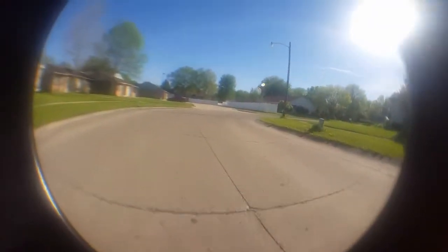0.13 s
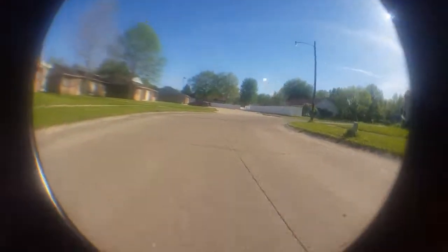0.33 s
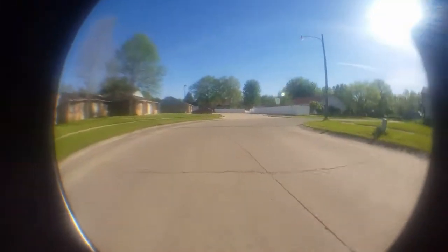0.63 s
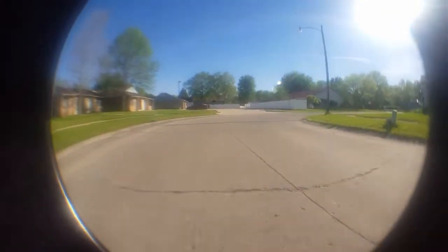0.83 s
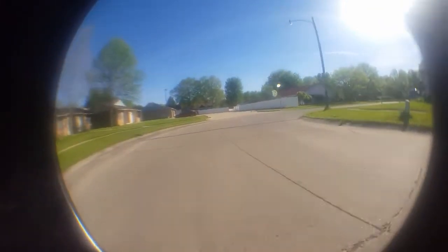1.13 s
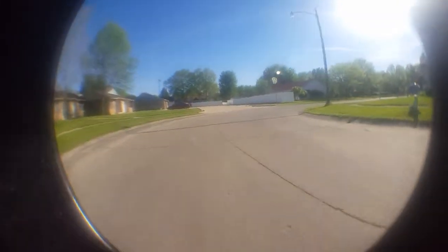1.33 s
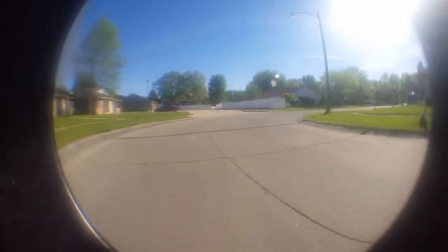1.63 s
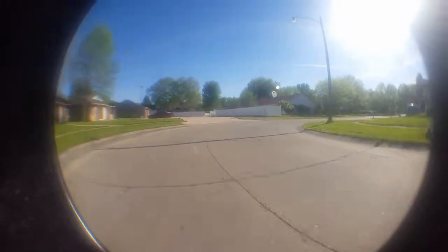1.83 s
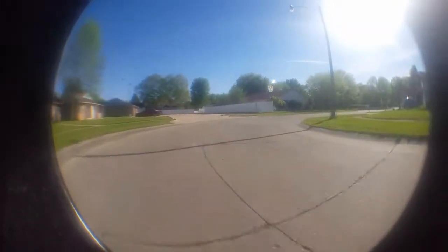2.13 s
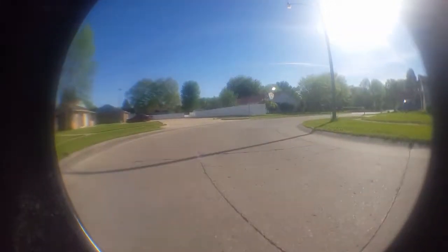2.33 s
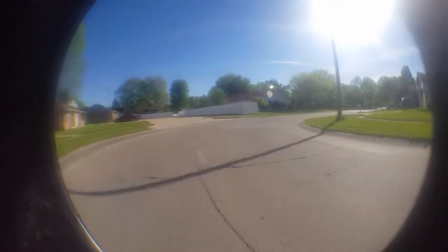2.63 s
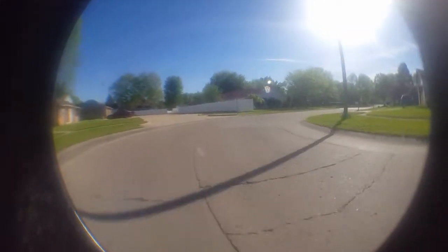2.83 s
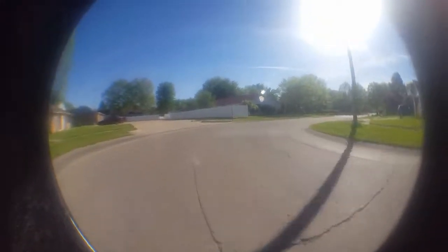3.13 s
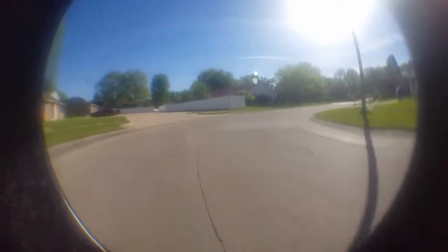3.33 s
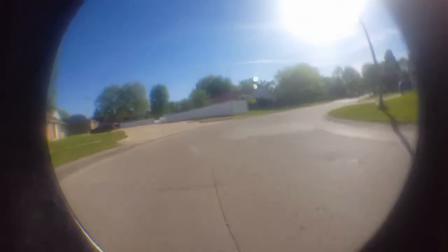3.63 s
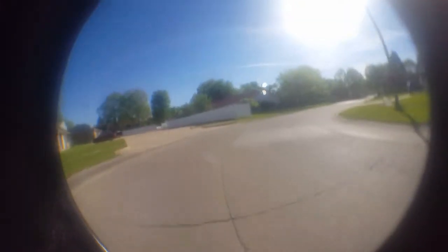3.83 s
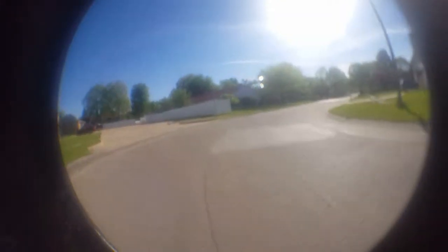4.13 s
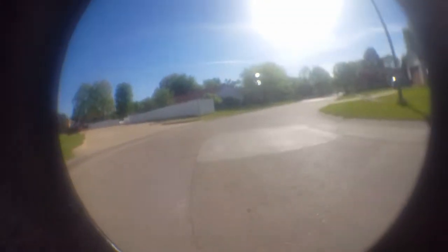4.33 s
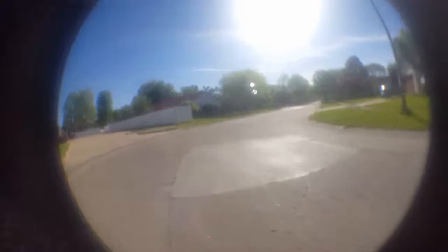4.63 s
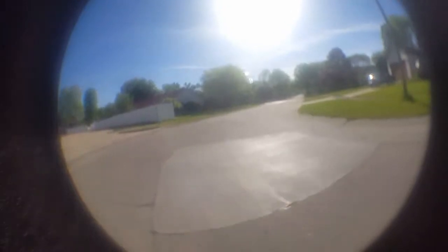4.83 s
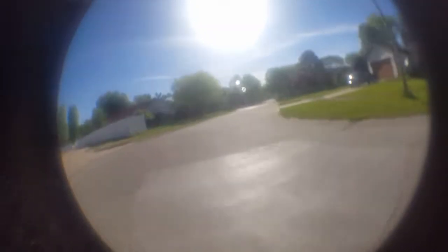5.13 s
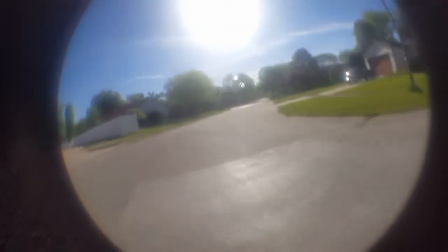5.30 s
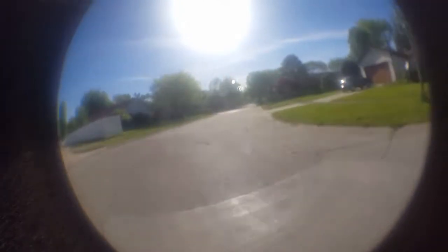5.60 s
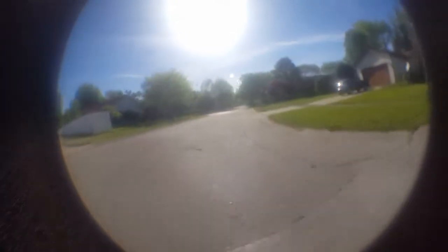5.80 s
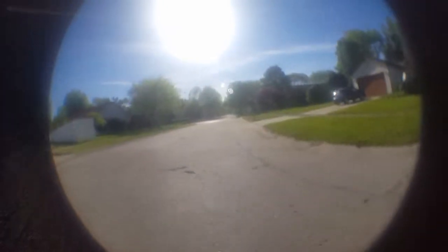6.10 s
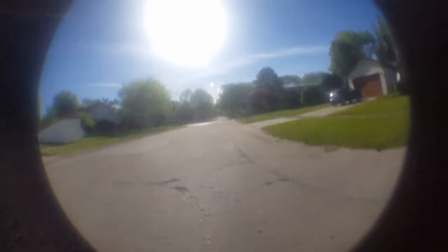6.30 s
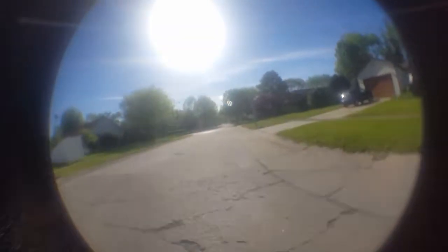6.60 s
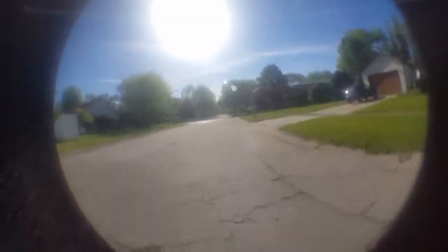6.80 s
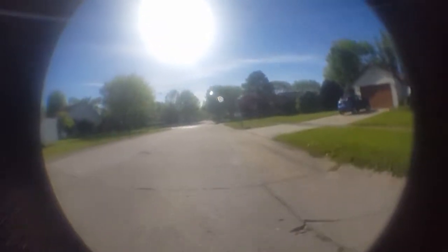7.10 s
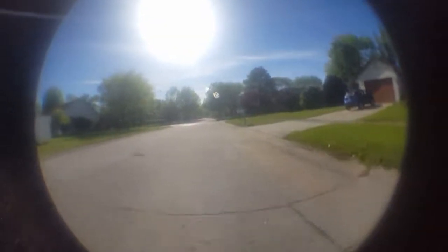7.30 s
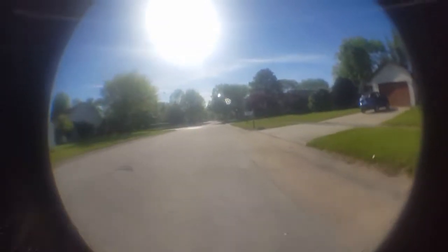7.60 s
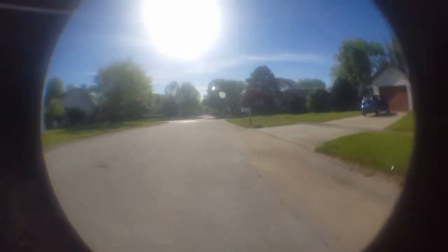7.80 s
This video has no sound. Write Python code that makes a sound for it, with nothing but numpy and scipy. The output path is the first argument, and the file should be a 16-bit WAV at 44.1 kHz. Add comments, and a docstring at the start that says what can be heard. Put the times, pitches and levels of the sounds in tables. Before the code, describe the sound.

Skateboard wheels rumble and hiss along a concrete street, knocking over cracks and crunching grit as gusts hit the microphone.

```python
"""A skateboard rolls along a concrete street, heard from a small camera carried on the ride.
From the start, the rough road shakes the wooden deck and rattles the trucks (the metal axle mounts),
the wheels hiss, the bearings sizzle and the headwind buffets both microphones. Soon the wheels crush
small stones and knock over cracks, the hardest with a clack. After about four seconds the wind eases,
after six a metallic hum comes up, and just before the end gusts return and the loudest clack lands."""
import sys
import numpy as np
from scipy import signal
from scipy.fft import rfft, irfft
from scipy.io import wavfile
from scipy.ndimage import uniform_filter1d, map_coordinates

SR = 44100
rng = np.random.default_rng(int(sys.argv[2]) if len(sys.argv) > 2 else 0)


def dump(signal):
    """Clip the signal to [-1, 1] and save it as 16-bit WAV at the path in sys.argv[1]."""
    limited = np.clip(np.atleast_2d(signal).T, -1, 1)
    pcm = np.round(limited * 32767).astype(np.int16)
    wavfile.write(sys.argv[1], SR, pcm)


N = 350595

# The road under the wheels. Each row: time in seconds, deck shake in dB,
# deck bending compared with the shake in dB, truck rattle in dB, wheel hiss in dB.
ROAD = [(0.0, -8.5, -1, -30, -31.5), (0.15, -22, -8, -40.5, -42.5), (0.45, -21, 1, -38.5, -40.5),
        (0.57, -19.5, 3, -42, -40), (0.75, -20, -1, -42.5, -41.5), (1.0, -18, 0, -39.5, -38.5),
        (1.45, -22.5, 0.5, -40, -38.5), (1.9, -20, -1.5, -41.5, -39), (2.2, -20.5, 4, -43, -37.5),
        (2.45, -16, -3, -39.5, -38.5), (2.8, -22, 0.5, -43, -38.5), (2.97, -25, 4.5, -48, -39),
        (3.3, -21, 1.5, -41.5, -40), (3.8, -17.5, -4.5, -41, -39), (4.2, -20.5, 0, -49.5, -41),
        (4.6, -20, 2.5, -44, -42), (4.72, -19.5, -0.5, -40, -42), (4.93, -15, -6, -36, -38.5),
        (4.99, -20, -2, -41, -44), (5.1, -15.5, 0, -39, -35), (5.24, -20, 3.5, -38, -39.5),
        (5.31, -17, -4, -30, -39), (5.38, -15.5, 1, -40, -42), (5.44, -16.5, -3, -35.5, -42),
        (5.55, -22.5, 0.5, -48.5, -42.5), (5.95, -21, 2, -45.5, -41.5), (6.15, -19.5, 4.5, -44, -41.5),
        (6.55, -18.5, 1.5, -39, -40.5), (6.75, -16.5, 2.5, -45, -40), (6.95, -16.5, 5, -40.5, -39),
        (7.1, -16, 0.5, -42.5, -40.5), (7.2, -20.5, 9, -45, -40), (7.3, -21.5, 3.5, -45, -42),
        (7.42, -13, 3.5, -38.5, -35), (7.72, -18, 6, -50, -38.5), (7.82, -20, 1.5, -50, -46),
        (7.95, -19, 5, -43, -45)]


def undb(db):
    return 10 ** (np.asarray(db) / 20)


def unit(x):
    return x / np.sqrt(np.mean(x ** 2))


def curves(table):
    """Join a table's rows with straight lines: one curve for each column after the time."""
    times, *columns = np.transpose(table)
    return [np.interp(np.arange(N) / SR, times, column) for column in columns]


def response(points, share=1):
    """A filter's answer to one click, built from (Hz, dB) points; share scales the dB."""
    hz, db = np.transpose(points)
    log_hz = np.log(np.maximum(np.arange(2049) * SR / 4096, 1))
    cepstrum = irfft(np.interp(log_hz, np.log(hz), share * db) * np.log(10) / 20)
    cepstrum[1:2048] *= 2  # folded so that nothing sounds before the click
    cepstrum[2049:] = 0
    return irfft(np.exp(rfft(cepstrum)))


def colour(x, impulse):
    return signal.fftconvolve(x, impulse)[:N]


def ring(x, hz, width):
    """Let a sound ring at one pitch; a narrower width rings longer."""
    return signal.lfilter(*signal.iirpeak(hz, hz / width, SR), x)


def modes(x, table):
    """Several rings at once; neighbours swing opposite ways."""
    return sum((-1) ** k * undb(db) * ring(x, hz, width) for k, (hz, width, db) in enumerate(table))


def walk(rate):
    """A smooth random wander that takes rate steps a second."""
    step = int(SR / rate)
    held = np.repeat(rng.standard_normal(N // step + 1), step)[:N]
    return unit(uniform_filter1d(uniform_filter1d(held, step), step))


def grains(rate, scatter_db):
    """About rate random clicks a second, uneven in size."""
    when, size, sign = rng.random(N), rng.exponential(size=N), rng.standard_normal(N)
    return unit((when < rate / SR) * np.sign(sign) * undb(scatter_db * np.minimum(size, 5)))


def swell(t, length, rise):
    """A quick rise and a rounded fall."""
    return (1 - np.exp(-t / rise)) ** 1.33 * np.exp(-(t / max(length, .002)) ** 2)


def burst(noise, envelope):
    """Shape noise with an envelope and give it that envelope's energy."""
    return noise * envelope * np.sqrt(np.sum(envelope ** 2) / np.sum((noise * envelope) ** 2))


def wood(low, roar, middle, hollow, high):
    """Five kinds of push ring the deck; a board this small gives off no deep bass."""
    # The deck's rings. Each row: pitch in Hz, width in Hz, level in dB.
    rings = [(131.6, 45, -9.5), (161, 35, -0.5), (237, 74.4, 0), (503.8, 24.5, 7), (560, 57, -1.5),
             (646.6, 64, -0.5), (783, 32, -11.5), (1000, 396, -22), (1316, 57, -21.5), (1190, 230, -30)]
    sound = (modes(low, rings[:3]) - modes(roar, rings[3:4]) + modes(middle, rings[4:6])
             + modes(hollow, rings[6:7]) - modes(high, rings[7:]))
    return signal.sosfilt(signal.butter(2, 110, "high", fs=SR, output="sos"), sound)


def deck(grain, bumps, shake_db, bend_db, blows):
    """Road grain and knocks shake and bend the wooden board."""
    # The roar, the deck's strongest ring. Each row: time in seconds, level in dB.
    roar_levels = [(0, -29), (.13, -20), (.45, -19), (.6, -13.5), (.8, -18.5), (1.08, -31), (1.35, -18.5),
                   (1.64, -22), (1.9, -16.5), (2.05, -19.5), (2.15, -25), (2.3, -19.5), (2.42, -16.5),
                   (2.52, -21), (2.7, -21), (2.82, -23), (2.98, -16), (3.1, -25), (3.25, -20), (3.45, -30),
                   (3.6, -21), (3.9, -23), (4.25, -21.5), (4.4, -23), (4.74, -19), (4.89, -27), (5.02, -18),
                   (5.3, -23.5), (5.5, -24.5), (5.91, -29), (6.15, -16), (6.3, -19.5), (6.42, -20),
                   (6.8, -22.5), (7.1, -20), (7.29, -24), (7.42, -16), (7.68, -22), (7.82, -24),
                   (7.95, -23)]
    middle, low, hollow, high = blows
    shake = grain * undb(shake_db + 0.6 * bumps)
    bending = shake * undb(bend_db + 1.12 * walk(16))
    roar = grain * undb(curves(roar_levels)[0] + 0.5 * bumps)
    sound = wood(bending + low, roar + middle, shake + middle, undb(1.5) * shake + hollow, shake + high)
    return sound / np.std(wood(grain, grain, grain, grain, grain))


def trucks(level_db, blows):
    """Loose trucks and washers rattle; two of their rings trade strength as the weight shifts."""
    # The metal's rings. Each row: pitch in Hz, width in Hz, level in dB.
    rings = [(1700, 240, -8.5), (1960, 290, 5.5), (2187, 41, 8.5), (2562, 56, 3), (2928, 42, 7.5),
             (3030, 1360, 3), (3480, 110, 9.5), (4170, 190, -4.5), (4570, 350, 4), (4810, 350, 0),
             (5660, 110, -8.5), (6100, 1500, -30)]
    # The shifting weight. Each row: time in seconds, upper ring minus lower ring in dB.
    lean = [(0, -7.5), (1.5, -4.5), (2.9, -3), (4.2, 0), (4.8, 8), (5.5, 7), (6.2, 0.5), (6.8, -8),
            (7.95, -7)]
    lean_db, = curves(lean)
    shared, looseness_db = grains(250, scatter_db=4.5), 2 * walk(25)
    sides = []
    for side_blows in blows:
        ticks = unit(0.92 * shared + grains(700, scatter_db=4) + 0.51 * rng.standard_normal(N))
        push = ticks * undb(level_db + looseness_db) + side_blows
        lower = modes(push * undb(-lean_db / 2), rings[1:2])
        upper = modes(push * undb(lean_db / 2), rings[3:4])
        others = modes(push, [rings[0], rings[2]]) - modes(push, rings[4:])
        sides.append((others - lower + upper) / np.std(modes(ticks, rings)))
    return np.array(sides)


def wheels(level_db, grit):
    """Wheels hiss on the concrete, and the grit under them takes on the same tone."""
    # The wheels' tone. Each row: frequency in Hz, level in dB.
    tone = [(700, -6.5), (1300, 1), (2300, -5.5), (3600, 0), (5200, -1.5), (6800, -4.5), (8200, -11),
            (12200, -17), (15500, -25)]
    impulse = response(tone)
    impulse /= np.linalg.norm(impulse)
    hiss = rng.standard_normal((2, N)) * undb(level_db)
    return np.array([colour(side, impulse) for side in hiss + grit])


def bearings(jolts):
    """Tiny ticks make a thin, high sizzle that follows the jolts and comes in bursts."""
    # The sizzle. Each row: time in seconds, narrow band in dB, broad band in dB.
    sizzle = [(0.0, -69, -66), (1.1, -66, -68), (1.25, -56, -68), (1.8, -69, -66), (2.3, -61, -66),
              (2.8, -56, -63.5), (3.15, -55, -65), (3.3, -67, -64), (3.7, -80, -60), (3.83, -57, -64.5),
              (3.95, -71, -65), (4.8, -68, -72), (5.1, -66, -57), (5.45, -68, -53), (5.6, -70, -66),
              (6.1, -70, -57), (6.8, -54, -64), (7.25, -68, -58), (7.4, -64, -54), (7.7, -65, -57),
              (7.95, -70, -62)]

    def band(hz, width):
        sides = [grains(2500, scatter_db=6) for _ in range(2)]
        return np.array([unit(ring(ring(ticks, hz, width), hz, width)) for ticks in sides])
    narrow_db, broad_db = curves(sizzle)
    bursts_db = 2.5 * walk(14)
    narrow = band(hz=13700, width=1000) * undb(narrow_db)
    broad = band(hz=12900, width=2000) * undb(broad_db + bursts_db)
    return (narrow + broad) * undb(1.2 * jolts)


def wind():
    """Air swirls at each microphone separately: quick gusts over a deeper buffeting."""
    # The headwind. Each row: time in seconds, gusts in dB, buffeting in dB, left minus right in dB.
    headwind = [(0.0, -13, -34.5, 3), (0.5, -17, -32.5, 4), (1.0, -17.5, -34, 3), (1.5, -17, -32, 4),
                (2.2, -17.5, -29.5, 6), (3.0, -19, -33.5, 2), (3.3, -22, -35.5, -1), (3.8, -19.5, -33, 4.5),
                (4.3, -28.5, -40, 2), (5.2, -28.5, -38.5, 5), (5.8, -32.5, -41, 2), (6.5, -30, -38, -4),
                (7.0, -58, -29, 3), (7.4, -23.5, -34.5, -3), (7.95, -74, -33.5, 2)]
    # The tones of gusts and buffeting. Each row: frequency in Hz, level in dB.
    gust_tone = [(60, -54), (130, -6), (220, -1), (380, 2), (560, -2.5), (900, -15.5), (1400, -25.5),
                 (2500, -59.5)]
    buffet_tone = [(20, -34), (35, -13.5), (60, -4.5), (100, 4), (150, 0), (300, -56)]

    def swirl(tone):
        noise = unit(colour(rng.standard_normal(N), response(tone)))
        return noise * undb(1.9 * walk(12) + 1.52 * walk(30))
    gust_db, deep_db, pan_db = curves(headwind)
    deep = np.array([swirl(buffet_tone), swirl(buffet_tone)])
    deep += 0.38 * swirl(buffet_tone)  # this part shakes the whole camera
    gusts = np.array([swirl(gust_tone), swirl(gust_tone)])
    return (gusts * undb(gust_db) + deep * undb(deep_db)) * undb([pan_db / 2, -pan_db / 2])


def road_hits():
    """List what the wheels strike: cracks, plus chance pebbles that hit harder on rougher road."""
    # An axle meets a crack or stone. Each row: start in seconds, knock in dB, clatter in dB,
    # length in seconds, low rings compared with the knock in dB, sharpness from 0 (blunt) to
    # 1 (ringing), left minus right in dB, hollow ring compared with the knock in dB.
    cracks = [(.012, -27, -22, 0.02, 0, .6, 2, -3), (.038, -8.5, -34, 0.0028, -7, 0.33, 0, 5.5),
              (.05, -17, -19, 0.022, 8, .9, -2, -10), (.078, -32, -18, 0.022, 0, 1, -4, 0),
              (.104, -24.5, -19, 0.011, 14.5, 0.6, -7, 4), (.246, -17.5, -23, 0.032, 7.5, 0.28, 0, 7),
              (.307, -12.5, -36, 0.011, -8, .3, -12, -2), (.4339, -22, -15.5, 0.01, 9, 0.61, -6, 0),
              (.51, -6.5, -17, 0.016, -8, 0.27, -2, -5), (.524, -6.5, -37, 0.011, -8, .1, 0, -1),
              (.6825, -4.5, -6, 0.0066, -12, 0.38, -7, 6), (.697, -24, -36, 0.0096, -8, .3, 0, 9),
              (.821, -20, -25, 0.014, 7, 0.84, -2, 1), (.863, -19.5, -36, 0.022, -4, 0.28, 4, -1),
              (1.03, -13, -35, 0.049, -5, 0.33, -7, 6.5), (1.152, -15.5, -19, 0.013, 7, 0.45, -5, -8),
              (1.224, -14, -12, 0.011, 6, 0.9, 5, 6), (1.342, -10, -20.5, 0.018, -9, 0.56, 9.5, 9),
              (1.525, -11.5, -14, 0.0085, -7, 0.34, 19, 7.5), (1.632, -13, -34, 0.0036, -6, 0.25, -1, -4),
              (1.663, -19, -34, 0.0069, -9, .3, 0, -3), (1.895, -17, -44, .011, 2, .18, 0, -1),
              (2.04, -17, -35, 0.038, -15, .2, 0, 5), (2.17, -19, -38, .016, -7, .26, 0, 3),
              (2.32, -21, -23, 0.012, -10, .3, 0, 3), (2.376, -13.5, -41, 0.2, -1.5, 0.36, -2, 7),
              (2.455, -8.5, -16, 0.0077, -8, .1, -7, 1), (2.638, -12, -28.5, 0.032, -2, 0.4, 7, 9.5),
              (2.934, -15.5, -41, 0.013, 0, 0.4, 0, 6), (3.342, -22, -28, 0.0092, -4, 0.67, 0, 3),
              (3.349, -11, -18.5, 0.022, 4, 0.36, 1, 6), (3.37, -13, -29, 0.009, -15, 0.33, 0, 0),
              (3.405, -15.5, -27, 0.0087, -15, .28, -2, -8), (3.477, -21.5, -27, 0.022, 10, 0.58, 3, -5),
              (3.545, -16.5, -17, .026, 6.5, 0.99, -2, 12.5), (3.725, -18, -46, 0.032, 10.5, .21, 5, 2),
              (3.8, -23, -30.5, 0.054, 5, 0.76, -1, 8), (4.274, -24, -27, .01, -2, .3, 0, 2),
              (4.283, -5.5, -18, 0.018, -5, 0.13, -7, -0.5), (4.31, -13, -34, 0.0091, -12, .3, 0, 6),
              (4.39, -15, -17.5, .011, -2, 0.43, 0, 0), (4.465, -20, -37, 0.023, 4, .2, 0, 0),
              (4.479, -8.5, -15, 0.021, 2, 0.91, 3, 7), (4.506, -14, -36, 0.011, -10, .3, 0, -4),
              (4.565, -15, -22, 0.012, -14, .34, 0, -5), (4.62, -17, -37, 0.043, -13, .23, -7, 2),
              (4.686, -31, -28, 0.025, 2, 0.83, -7, 4), (4.817, -34, -32, .012, 0, .7, 0, 4),
              (4.844, -14, -28, 0.017, 1, 0.56, 0, 2), (4.917, -18.5, -25, .012, -3, 0.72, -2, -4),
              (4.933, -18, -24, 0.02, 3, 0.72, -3, 2), (4.957, -20, -22, 0.011, 9, 0.4, 2, 5),
              (5.043, -24, -23, 0.035, 10, 0.9, -1, 6), (5.111, -33, -32, .015, -5, 1, -4, 10),
              (5.155, -44, -33, .015, 0, .97, 0, 7), (5.181, -15.5, -26, 0.032, 2, 0.43, -2, 3),
              (5.216, -23, -31, .012, 0, .8, 0, 6), (5.25, -27, -30, 0.01, -4, .8, 0, 14),
              (5.275, -18, -25.5, 0.067, 4, 0.97, 0, 10), (5.322, -25, -30, 0.03, -7, 1, -2, 9),
              (5.341, -22, -20, 0.015, 9.5, 0.47, 1, 2), (5.402, -20.5, -23, 0.033, 4, 0.76, 0, 9),
              (5.428, -16, -29, 0.021, 1, 0.89, -1, 7), (5.456, -19, -21, 0.013, 1, 0.95, -5, 2),
              (5.838, -23, -35, 0.047, 6.5, 0.33, -4, -9), (6.058, -13.5, -32.5, 0.042, 8.5, 0.12, -3, 1),
              (6.098, -8.5, -24, 0.02, 0, 0.42, -5, -2), (6.302, -17, -16, 0.0077, 8.5, 0.49, 3, 9),
              (6.314, -17, -18, 0.015, -14, 0.8, 0, 18), (6.451, -22, -24, 0.018, 7, 0.64, -1, 3),
              (6.496, -25, -45, 0.018, 11, .2, 0, 0), (6.564, -18.5, -34, 0.0072, -10, .69, 0, 8),
              (6.68, -18, -36, 0.016, 6.5, .22, 1, -1), (6.7035, -17.5, -23, 0.01, 7, 0.44, 3, -6),
              (6.822, -20, -37, 0.0042, -9, .5, 1, 13.5), (6.832, -32, -42, 0.01, 10, .2, 0, -9),
              (6.865, -20, -42, 0.0091, 8, .2, 0, -2), (6.89, -13.5, -32, 0.024, 6.5, 0.32, -2, -6),
              (6.945, -25, -36, 0.025, 16, 0.36, 0, -5), (6.993, -9.5, -16, 0.0084, 4, 0.4, 0, 1),
              (7.068, -22, -42, 0.011, 11, .2, 0, -2), (7.135, -19.5, -48, 0.029, 9, 0.23, 0, -2),
              (7.164, -22, -45, 0.015, 7, .2, 2, -4), (7.176, -13, -18.5, 0.017, 5.5, 0.58, 1, 0),
              (7.197, -10, -30, 0.033, 0.5, 0.42, 0, 6.5), (7.352, -22.5, -50, 0.036, 13.5, .2, 0, 0),
              (7.38, -11.5, -29, 0.021, -1, .3, 0, 3), (7.421, -21, -47, 0.022, 9, .2, 3, -2),
              (7.477, -11.5, -26, 0.02, -10, 0.3, 4, 7), (7.5, -23, -47, 0.021, 8, .2, 0, -5),
              (7.569, -15.5, -22.5, 0.035, 9.5, 0.8, 0, 9), (7.616, -20.5, -49, 0.046, 10.5, .2, 0, -6),
              (7.656, -14, -27, 0.017, 5, 0.51, 4, 9), (7.7, -22.5, -32.5, 0.048, 14.5, 0.53, 7, 13),
              (7.7765, -34, -20, .008, -7, .9, 0, 3), (7.7805, -3.5, -12, 0.017, -0.5, 0.48, 5, -2)]
    times, shake_db, _, rattle_db, _ = np.transpose(ROAD)
    pebbles, pebbles_per_s = [], 3
    for when, knock, rattle, size, sharp, side in rng.random((int(pebbles_per_s * N / SR), 6)):
        start = when * N / SR
        knock_db = np.interp(start, times, shake_db) - 10 + 4 * knock
        clatter_db = np.interp(start, times, rattle_db) - 9 + 4 * rattle
        length, pan_db = 0.024 * (.5 + size), 6 * (side - .5)
        pebbles.append((start, knock_db, clatter_db, length, 0, sharp, pan_db, 8 * sharp))
    return np.vstack([cracks, pebbles])


def knocks(hits):
    """A wheel drops in, then strikes the far edge: pushes for the middle, low, hollow and high rings."""
    out, t = np.zeros((4, N)), np.arange(4096) / SR
    near_edge = np.exp(-((t - .0008) / .00024) ** 2)
    far_edge = undb(-9) * np.exp(-((t - .0128) / .00015) ** 2)
    edges = near_edge - far_edge
    for start, db, _, length, low_db, sharp, _, hollow_db in hits:
        i, high_db = int(start * SR), -4.5 + 16.2 * sharp
        ragged = uniform_filter1d(rng.standard_normal(len(t)), size=12)
        blow = 1.17 * edges + 0.28 * burst(ragged, swell(t, length, rise=0.0012))
        # the board shudders on a moment after the blow
        rebound = 0.34 * burst(ragged, swell(t, length=0.03, rise=0.026))
        middle = blow + undb(-7.5) * rebound
        hollow = undb(-11) * blow + rebound + 2.3 * edges
        pushes = np.array([middle, undb(low_db) * blow, undb(hollow_db) * hollow, undb(high_db) * blow])
        out[:, i:i + len(t)] += undb(db) * pushes[:, :N - i]
    return out


def clatter(hits):
    """Each hit sets off a volley of ticks: blows on the trucks and a spray of grit, both in stereo."""
    out, t = np.zeros((2, 2, N)), np.arange(2048) / SR
    # the two wheels of an axle strike a few milliseconds apart
    beat = 0.7 + np.cos(np.pi * (t - .0015) / .007) ** 4
    for start, _, db, length, _, sharp, pan_db, _ in hits:
        i, dullness, grit_db = int(start * SR), 0.68 - 0.46 * sharp, -1.5 - 6.5 * sharp
        noise = .25 * rng.standard_normal(len(t)) ** 3 + .5 * rng.standard_normal((2, len(t)))
        ticks = burst(noise, swell(t, 0.56 * length, rise=0.0044) * beat)
        ticks *= undb([[db + pan_db / 2], [db - pan_db / 2]])
        # rubber cushions soften the blows before they reach the metal
        rubber = [1, -dullness]
        blows = undb(-8) * signal.lfilter([1], rubber, signal.lfilter([1], rubber, ticks))
        out[..., i:i + len(t)] += np.array([blows, undb(grit_db) * ticks])[..., :N - i]
    return out


def stones(hiss_db):
    """Small stones crushed under the wheels give bright crackles a few milliseconds long."""
    # The clearest stones. Each row: start in seconds, level in dB before a shared boost.
    clear_stones = [(0.3072, -39), (0.4214, -38), (0.5137, -40), (0.5147, -45), (0.612, -37), (0.6833, -36),
                    (0.7713, -37), (0.8233, -36), (1.4055, -35), (1.4551, -38), (1.5254, -43),
                    (1.5449, -47), (1.629, -34), (1.6536, -36), (1.9415, -42), (2.0009, -40), (2.1146, -43),
                    (2.1745, -41), (2.2762, -39), (2.3216, -42), (2.3506, -40), (2.3825, -32),
                    (2.8619, -39), (2.9188, -37), (3.0046, -50), (3.0659, -46), (3.0784, -42.5),
                    (3.1383, -38), (3.2086, -37), (3.3518, -41), (3.4825, -38), (3.5438, -33),
                    (3.8227, -37), (3.8456, -35), (4.293, -41), (4.4872, -40), (4.6219, -39), (4.817, -53),
                    (5.0459, -35), (5.2155, -39), (5.248, -42), (5.4011, -37), (5.5358, -42), (5.7698, -56),
                    (5.8406, -44), (6.2607, -41), (6.3026, -42), (6.3764, -35.5), (6.6089, -40),
                    (6.8588, -39), (6.9396, -35), (6.992, -37), (7.042, -37), (7.3257, -37), (7.3791, -36),
                    (7.4001, -36), (7.4699, -38), (7.579, -37), (7.785, -31), (7.8341, -50)]
    times, db = np.transpose(clear_stones)
    boost_db, fade_s = 13.5, 0.0026
    starts = np.zeros(N)
    starts[(times * SR).astype(int)] = undb(db + boost_db)
    clear = signal.lfilter([1], [1, -np.exp(-1 / (fade_s * SR))], starts)
    faint = unit(uniform_filter1d(np.abs(grains(16, scatter_db=-3)), int(0.0054 * SR)))
    bright_noise = signal.lfilter([1, -1.3, .45], [1], rng.standard_normal((2, N)))
    return bright_noise * (faint * undb(hiss_db - 8) + clear)


def clacks():
    """The hardest cracks add a short, rough ring, pitched by where the edge catches the wheel."""
    # The clacks. Each row: start in seconds, relative level in dB, pitch in Hz.
    strikes = [(0.5117, -13, 2290), (0.6833, -19, 1500), (1.1543, -21, 1450), (1.2283, -16, 1250),
               (1.342, -20, 1170), (1.524, -19, 2560), (2.4564, -28, 2410), (3.3518, -13, 2110),
               (3.3584, -20, 2230), (3.5487, -20, 1310), (4.2842, -14.5, 2280), (4.3904, -23, 1320),
               (4.4843, -18, 1230), (6.097, -21, 2190), (6.11, -22, 1590), (6.3046, -19, 1340),
               (6.315, -13.5, 1370), (6.9922, -14, 2200), (7.1778, -24, 1230), (7.784, -5.5, 1200)]
    out, t = np.zeros(N), np.arange(2048) / SR
    shape = 2 * undb(-2.5) * swell(t, length=0.0053, rise=0.0034)
    for start, db, hz in strikes:
        i = int(start * SR)
        roughness = 1.1 * unit(uniform_filter1d(rng.standard_normal(len(t)), size=50))
        tone = np.sin(2 * np.pi * hz * t + roughness)
        out[i:i + len(t)] += (undb(db) * shape * tone)[:N - i]
    return out


def hum(grain, bumps, hz=1900, width=160):
    """Road grain keeps up a metallic ring that grows late in the ride."""
    # The hum. Each row: time in seconds, level in dB.
    levels = [(0, -66), (5.9, -64), (6.4, -51), (6.7, -47), (7.1, -50), (7.4, -47), (7.7, -50), (7.95, -60)]
    return unit(ring(ring(grain, hz, width), hz, 2 * width)) * undb(curves(levels)[0] + bumps)


def scene():
    """The same bumps shake every part of the board, so all flicker alike; wind blows over them."""
    shake_db, bend_db, rattle_db, hiss_db = curves(ROAD)
    hits = road_hits()
    bumps = 0.3 * walk(6) + 0.3 * walk(18) + 1.24 * walk(50)
    grain = unit(rng.standard_normal(N) + 0.37 * grains(600, scatter_db=4))
    flutter = walk(110)
    truck_blows, grit = clatter(hits)
    board = (deck(grain, bumps, shake_db, bend_db, knocks(hits))
             + trucks(rattle_db + bumps, truck_blows)
             + wheels(hiss_db + 0.72 * bumps + 1.5 * flutter, grit + stones(hiss_db))
             + clacks() + hum(grain, bumps))
    # the board is a little nearer the left microphone, less so as the ride turns
    right_lag_s = np.linspace(1.4e-4, 5e-5, N)
    board[1] = map_coordinates(board[1], [np.arange(N) - right_lag_s * SR], mode="mirror")
    return board + bearings(0.65 * bumps + flutter) + wind()


def record(dry):
    """Each microphone has its own tone; the loudest knocks are rounded and the top treble is cut."""
    # The left opening faces away from the treble. Each row: frequency in Hz, left minus right in dB.
    facing = [(30, 1), (70, 0), (700, 0.3), (2400, 2), (5000, 0.5), (7000, -11), (10000, -15.5),
              (12000, -8), (13700, -13.5), (15500, -25)]
    # Small holes over both microphones swallow some treble. Each row: frequency in Hz, gain in dB.
    holes = [(6500, -2), (8200, -6.5), (10200, -18), (12000, -8), (13300, -5.5), (15500, -11)]
    sides = colour(dry[0], response(facing, 1 / 2)), colour(dry[1], response(facing, -1 / 2))
    muffled = np.array([colour(side, response(holes)) for side in sides])
    treble_cut = signal.ellip(16, .3, 80, 15780, fs=SR, output="sos")
    return signal.sosfilt(treble_cut, np.tanh(.9 * muffled) / .9)


dry = scene()
out = record(dry)
dump(out)
```